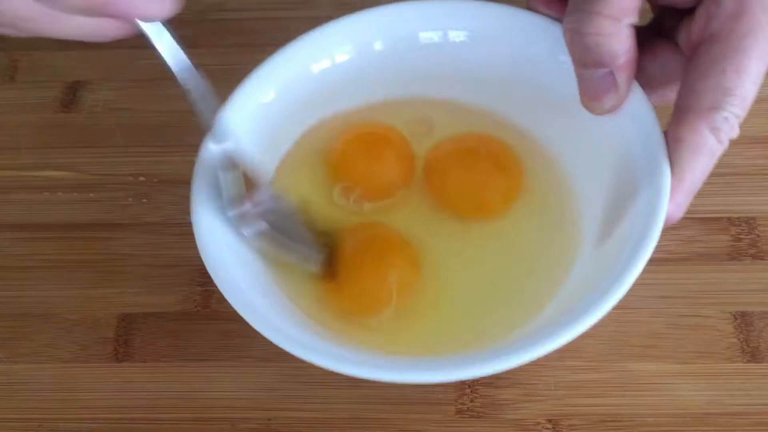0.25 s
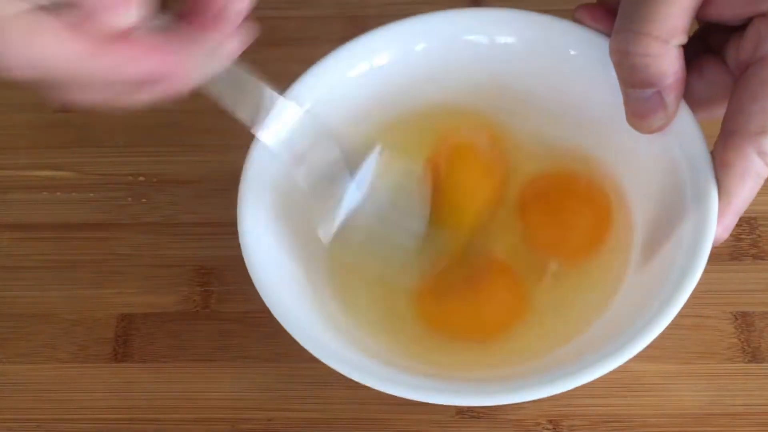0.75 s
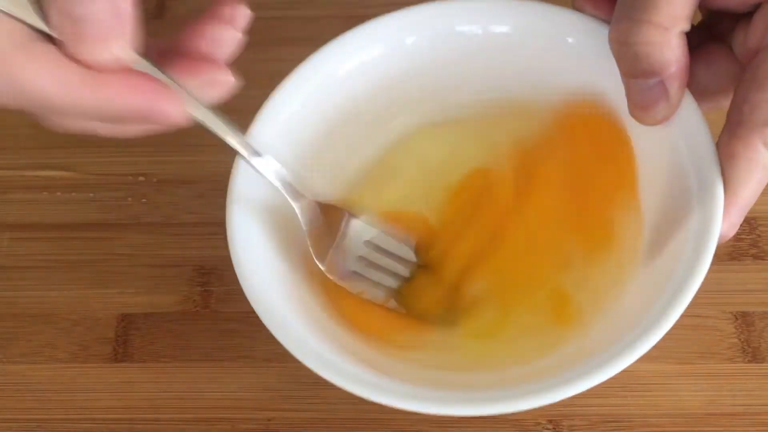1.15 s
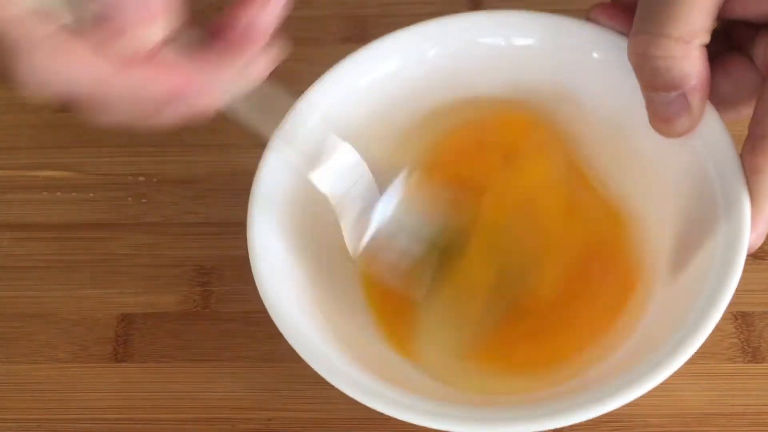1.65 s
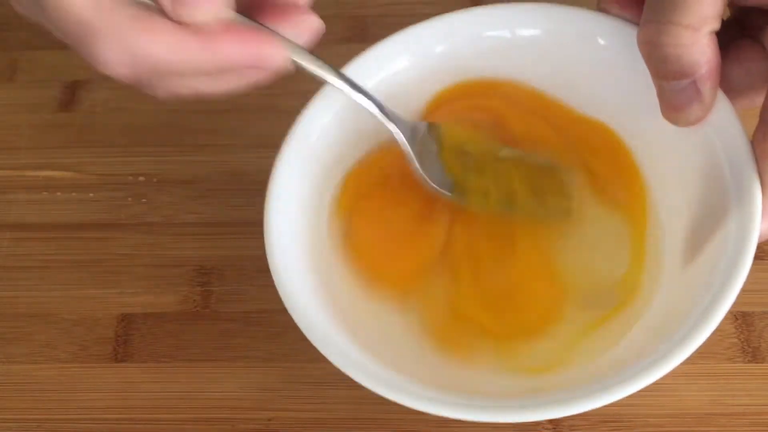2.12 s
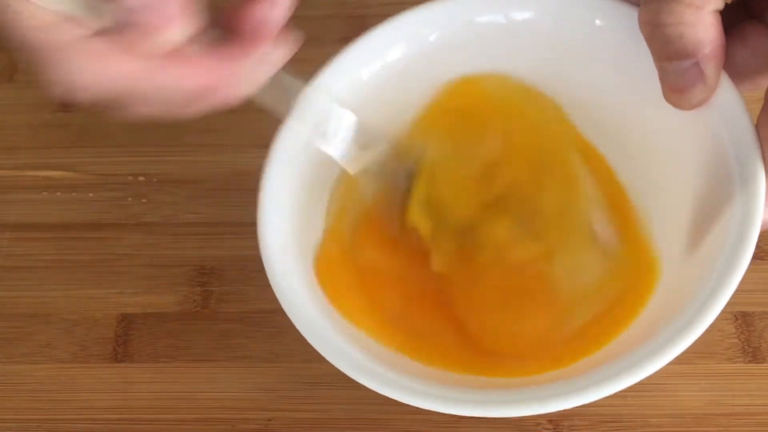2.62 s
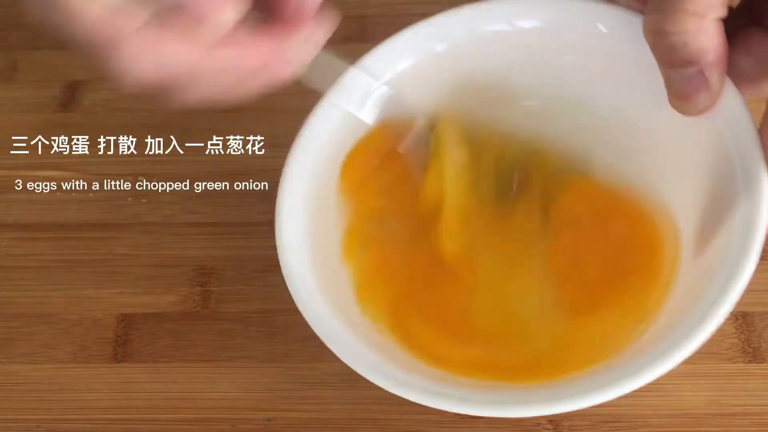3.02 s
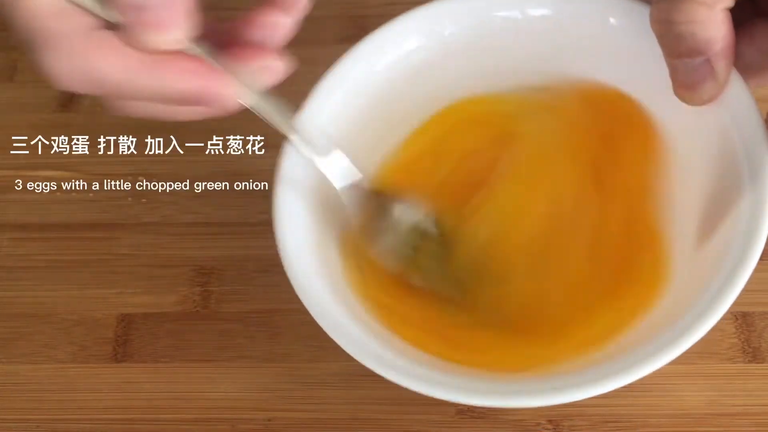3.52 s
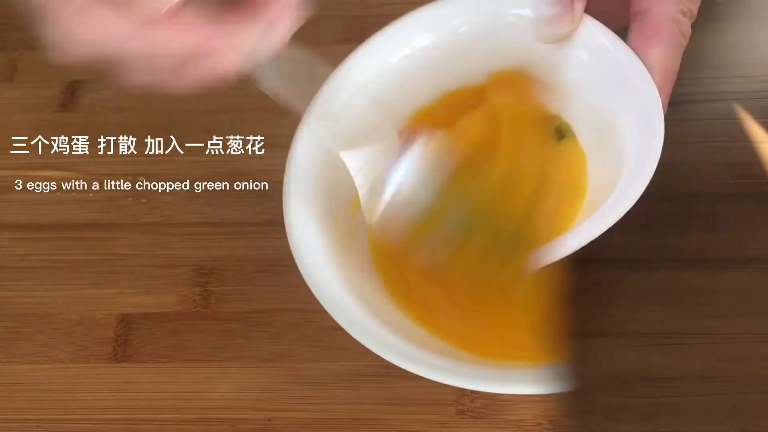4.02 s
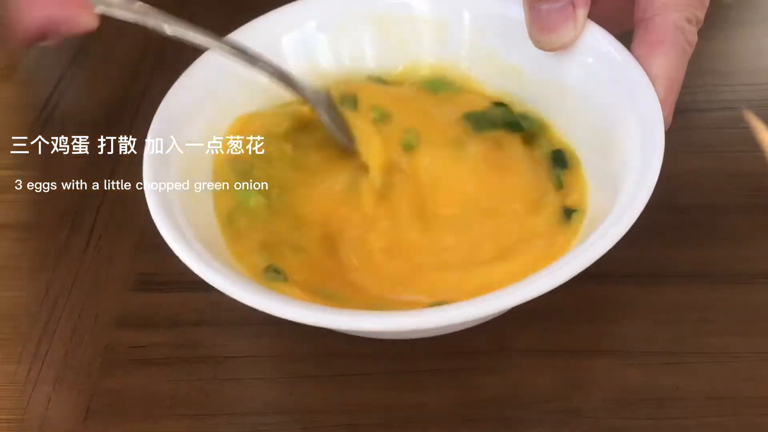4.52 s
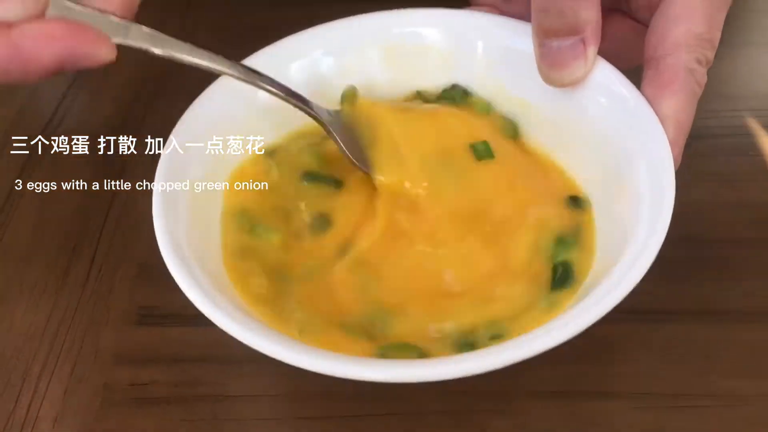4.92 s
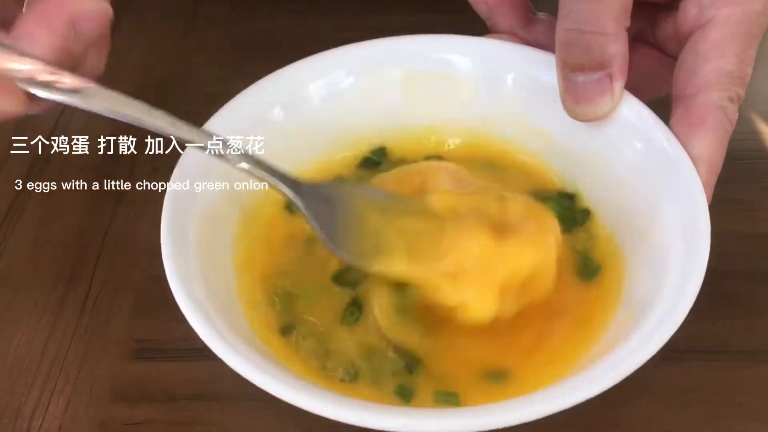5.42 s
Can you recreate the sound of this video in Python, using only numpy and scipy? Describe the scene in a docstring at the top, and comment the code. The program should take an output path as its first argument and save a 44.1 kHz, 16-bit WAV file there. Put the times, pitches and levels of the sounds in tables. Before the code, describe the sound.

Rapid, regular fork clinks against a hand-held ceramic bowl grow eggy and plopping, then give way to quieter, uneven stirring taps.

```python
"""A metal fork beats eggs in a hand-held ceramic bowl, about 5.5 strokes a second, after a dish is set down.
Each stroke excites damped bowl modes and the fork's own modes; egg on the fork adds body and damps its ring.
Air pockets plop as gliding sine bubbles, tines slap and scrape as noise bursts, and one squeaks twice.
Later the fork stirs lower in the bowl with double taps. Two reflections and a noise tail form a small
kitchen; filtered noise and a wavering low drone form a faint outdoor rumble."""
import sys
import numpy as np
from scipy import signal
from scipy.fft import rfft, irfft
from scipy.io import wavfile

SR = 44100
rng = np.random.default_rng(int(sys.argv[2]) if len(sys.argv) > 2 else 0)


def to_wav(sig):
    """Store sig (one row per channel, or 1-D mono) as 16-bit WAV at the path in sys.argv[1].

    Samples outside -1..1 are clipped; the rate is SR.
    """
    pcm = np.clip(np.atleast_2d(sig), -1, 1) * 32767
    pcm = np.round(pcm).astype(np.int16)
    wavfile.write(sys.argv[1], SR, pcm.T)  # frames by channels


N = 249606
TIME = np.arange(N) / SR


def undb(db):
    """Level as a logarithm: 20 dB is a factor of ten in amplitude."""
    return 10 ** (np.asarray(db) / 20)


def add(track, s, sound):
    """Superposition: a sound is summed into the track at time s."""
    i = max(int(s * SR), 0)
    track[i:i + len(sound)] += sound[:max(N - i, 0)]


def band(x, lo_hz, hi_hz, order=3):
    """Causal Butterworth band-pass, its upper edge kept below half the sample rate."""
    sos = signal.butter(order, [lo_hz, min(hi_hz, .49 * SR)], "band", fs=SR, output="sos")
    return signal.sosfilt(sos, x)


def fade(t, t60):
    """Exponential damping: the amplitude falls by 60 dB in t60 seconds."""
    return np.exp(-np.log(1000) * t / t60)


def burst(t, t60):
    """Broadband impact: exponentially damped white noise."""
    return rng.standard_normal(len(t)) * fade(t, t60)


def ring(t, hz, t60, db, detune, scatter_db):
    """Modal superposition: each blow excites the modes at a slightly different spot and grip."""
    pitch, size, turn = rng.standard_normal((3, len(hz), 1))
    mode_hz = hz[:, None] * (1 + detune * pitch)
    waves = np.sin(2 * np.pi * (mode_hz * t + turn))
    gains = undb(db[:, None] + scatter_db * size)
    return np.sum(gains * waves * fade(t, t60[:, None]), axis=0)


# spectrum of outdoor rumble and room air: f/Hz, relative level per hertz/dB
AIR_SPECTRUM = [(20, -32), (40, 6), (60, 0), (90, -2), (170, 0.5), (280, -7), (500, -18), (1000, -21),
                (2500, -21.5), (5000, -28), (10000, -33.5), (16000, -42.5)]
# course of the rumble: t/s, relative bass level/dB, relative drone level/dB
RUMBLE_COURSE = [(0, 1.5, 1), (3.901, -4, -0.5), (4.3, -29, -7.5), (4.601, -20, -15.5), (5.66, -11, -19)]


def outdoors(air_db=-61, drone_db=-62, drone_hz=58.5, wander_hz=2.5, waver_db=2, bass_hz=170):
    """Spectral shaping of noise plus a frequency-modulated drone, which fades; the bass dips and part returns."""
    f = np.arange(N // 2 + 1) * SR / N
    hz, db = np.transpose(AIR_SPECTRUM)
    shape = undb(np.interp(np.log(f + 1), np.log(hz), db))
    air = irfft(rfft(rng.standard_normal(N)) * shape, N)
    air = undb(air_db) * air / np.std(air)
    bass = irfft(rfft(air) / (1 + (f / bass_hz) ** 2), N)
    s, bass_course_db, drone_course_db = np.transpose(RUMBLE_COURSE)
    knots = np.arange(0, N / SR + 1, .1)
    wander, waver = (np.interp(TIME, knots, rng.standard_normal(len(knots))) for _ in range(2))
    # sqrt(2) gives the sine unit effective value
    drone = np.sqrt(2) * np.sin(2 * np.pi * np.cumsum(drone_hz + wander_hz * wander) / SR)
    bass_gain = undb(np.interp(TIME, s, bass_course_db))
    drone_gain = undb(drone_db + waver_db * waver + np.interp(TIME, s, drone_course_db))
    return air - bass + bass_gain * bass + drone_gain * drone


# dish set down, knock and settling: t/s, knock level/dB, bright scrape level/dB
DISH_CONTACTS = [(.0045, -25, -30.5), (.014, -38, -48), (0.0211, -48, -25), (0.028, -32, -38),
                 (0.035, -35, -28), (0.052, -36, -41)]
# modes of the dish before the contact damps them further: f/Hz, t60/s, relative level/dB
DISH_MODES = [(1490, 0.047, -5.5), (1760, 0.038, 0), (1940, 0.036, -8.5), (2580, 0.054, -12.5),
              (3490, 0.022, -11), (5000, 0.02, -13)]


def dish(tail_db=-37, tail_t60=0.82, skid_db=-44, skid_t60=0.31, contact_t60=0.049):
    """Contact damping shortens the modes of a dish as it knocks; friction noise skids and a noise band rings out."""
    out, t = np.zeros(N), TIME[:SR // 3]
    for s, db, scrape_db in DISH_CONTACTS:
        modes = ring(t, *np.transpose(DISH_MODES), detune=0.045, scatter_db=-0.5)
        add(out, s, undb(db) * modes * fade(t, contact_t60))
        add(out, s, undb(scrape_db) * band(burst(t, 0.038), 6660, 8030, order=1))
    skid = band(burst(t, skid_t60), 940, 8000, order=3)
    add(out, DISH_CONTACTS[1][0], undb(skid_db) * skid)
    tail = band(burst(t, tail_t60), 1300, 2200, order=2)
    add(out, DISH_CONTACTS[0][0], undb(tail_db) * tail)
    return out


# near reflections: delay t/s, level/dB
REFLECTIONS = [(0.0103, -23.5), (0.0227, -30.5)]
# diffuse tail: lower edge f/Hz, upper edge f/Hz (capped below half the sample rate), t60/s, level/dB
DIFFUSE_TAIL = [(217, 1020, 0.74, -47.5), (1260, 2370, 0.53, -45.5), (2740, 3600, 0.9, -53.5),
                (4230, 7200, 0.33, -49), (7460, 10000, 0.32, -51), (10300, 24000, 0.23, -44.5)]


def kitchen(x, build_s=0.0036):
    """Convolution with a room response: two near reflections and a diffuse tail, shortest in the top band."""
    t = TIME[:SR * 3 // 4]
    response = sum(undb(db) * band(burst(t, t60), lo_hz, hi_hz) for lo_hz, hi_hz, t60, db in DIFFUSE_TAIL)
    response *= 1 - np.exp(-t / build_s)
    for delay, db in REFLECTIONS:
        response[int(delay * SR)] += undb(db)
    return x + signal.fftconvolve(x, response)[:N]


# contacts of fork and bowl: t/s, strength level/dB
CONTACTS = [(0.1836, -35), (.376, -31.5), (0.4207, -48), (0.5553, -30.5), (0.6055, -46), (.7367, -32),
            (.914, -32), (1.0959, -32.5), (1.271, -30), (1.4523, -30.5), (1.6321, -30.5), (1.8051, -31.5),
            (1.9772, -32.5), (2.003, -54), (2.1514, -27.5), (2.3342, -38), (2.532, -30.5), (2.7114, -26.5),
            (2.8805, -35), (2.9005, -30.5), (3.0875, -30.5), (3.2642, -25.5), (3.2766, -34.5),
            (3.4567, -33.5), (3.6421, -30.5), (3.826, -34), (4.0019, -33), (4.0615, -43.5), (4.1909, -38.5),
            (4.2648, -42.5), (4.302, -44.5), (4.3647, -45.5), (4.4017, -49), (4.44, -39.5), (4.4767, -39),
            (4.6665, -43), (4.795, -47.5), (4.8243, -39.5), (4.861, -37.5), (5.0367, -37), (5.068, -39.5),
            (5.1982, -39.5), (5.2305, -36.5), (5.262, -39), (5.4269, -35), (5.4402, -35.5), (5.626, -33.5),
            (5.6331, -33)]
STIR_FROM_S, STROKE_ABOVE_DB = 4.1, -37.5


def beating_strokes():
    """A level threshold selects the full strokes of the beating from the light taps between them."""
    return [(s, db) for s, db in CONTACTS if db > STROKE_ABOVE_DB and s < STIR_FROM_S]


def entry_ticks(lead_s=.034, scatter_s=.012, tick_db=-16.5, tick_t60=.008):
    """Liquid entry: the tines tick lightly on their way into the egg ahead of each full beating stroke."""
    out, t = np.zeros(N), TIME[:SR // 20]
    for s, db in beating_strokes():
        lead = lead_s + scatter_s * rng.uniform(-1, 1)
        add(out, s - lead, undb(db + tick_db) * band(burst(t, tick_t60), 3600, 9300, order=1))
    return out


# the yolks break up and coat the fork more and more between these times
COATING_START_S, COATING_END_S = 1, 2.34


def egg_coating(s):
    """Linear growth of the egg film on the fork, from 0 to 1."""
    return np.interp(s, (COATING_START_S, COATING_END_S), (0, 1))


# colour of a blow relative to its strength, for a clean, an egg-coated and a stirring fork:
# low register level/dB, middle level/dB, treble level/dB, free fork ring level/dB
CLEAN_COLOUR = (-14, -1, .5, -8)
COATED_COLOUR = (-3.5, 1.5, -1, -21.5)
STIRRING_COLOUR = (-3, 0, -1, -22)
# a contact just ahead of a harder one only grazes the wall and has less body
GRAZE_WITHIN_S, GRAZE_DB = .045, -11.5


def blows():
    """Damping by a liquid film: egg on the fork adds body and weakens its ring; a graze is thin."""
    following = CONTACTS[1:] + [(np.inf, 0)]
    for (s, db), (next_s, next_db) in zip(CONTACTS, following):
        coating = egg_coating(s)
        beating = (1 - coating) * np.array(CLEAN_COLOUR) + coating * np.array(COATED_COLOUR)
        colour = np.array(STIRRING_COLOUR) if s > STIR_FROM_S else beating
        low_db, mid_db, high_db, free_db = db + colour
        grazes = next_s - s < GRAZE_WITHIN_S and next_db > db
        yield s, low_db + GRAZE_DB * grazes, mid_db, high_db, free_db


# bowl with the fork against it: f/Hz, t60/s, relative level when beating/dB, when stirring/dB
CHOKED_BOWL = [(1593, 0.023, -25, -15), (2317, 0.026, -11.5, -3), (2501, 0.024, -11, -3.5),
               (3352, 0.013, -3.5, 2.5), (3577, 0.017, 1, -6), (4253, 0.0096, -11, 1.5),
               (5380, 0.031, -21.5, -32), (7010, 0.015, -14, -11), (7340, 0.0055, -5.5, 0),
               (8833, 0.0086, 0, -5.5), (9255, 0.013, -3.5, -6.5), (10430, 0.0047, -0.5, -6.5),
               (12880, 0.0056, -4.5, -26.5), (14120, 0.054, -20, -22.5), (16500, 0.015, -2, -27.5)]


def clink(t, stirring, levels_db, crack_db=-5, crack_t60=0.019, contact_s=.00035):
    """Modal excitation of the choked bowl; egg on the fork, stirring and grazing set three register levels."""
    hz, t60, beat_db, stir_db = np.transpose(CHOKED_BOWL)
    if stirring:  # the fork lands at more varied spots
        modes = ring(t, hz, t60, stir_db, detune=.015, scatter_db=3)
    else:
        modes = ring(t, hz, t60, beat_db, detune=.007, scatter_db=2)
    crack = undb(crack_db) * band(burst(t, crack_t60), 2000, 13000, order=1)
    # every blow swells in over a fraction of a millisecond
    blow = (modes + crack) * (1 - np.exp(-t / contact_s))
    registers = [band(blow, lo, hi) for lo, hi in [(600, 2900), (2900, 6000), (6000, 16000)]]
    # each register is levelled over its first hundredth of a second
    return sum(undb(db) * part / np.std(part[:SR // 100]) for db, part in zip(levels_db, registers))


def thump(t, start_hz=170, end_hz=78, sag_s=.008, t60=0.12):
    """Dispersion of bending waves in the table top: the higher ones arrive first."""
    nominal_hz = end_hz + (start_hz - end_hz) * np.exp(-t / sag_s)
    hz = nominal_hz * rng.uniform(0.66, 1.3)
    swell = 1 - np.exp(-t / sag_s)
    return np.sin(2 * np.pi * np.cumsum(hz) / SR) * fade(t, t60) * swell


# modes of the table top under the bowl: f/Hz, t60/s, relative level/dB
TABLE_MODES = [(176, 0.034, -19), (420, 0.028, -16.5), (604, 0.011, -17), (1113, 0.035, -24.5)]


def table_knock(t, knock_db=-8, thump_db=-24):
    """Structure-borne sound: a dull knock passes through the bowl into the table."""
    modes = ring(t, *np.transpose(TABLE_MODES), detune=0.057, scatter_db=5.5)
    return undb(knock_db) * modes + undb(thump_db) * thump(t)


# fork ringing freely after the blow: f/Hz, t60/s, relative level/dB
FORK_MODES = [(1682, 0.065, -3.5), (2446, 0.15, -11.5), (3070, 0.19, -6), (3360, 0.34, -24.5),
              (5150, 0.053, 5), (5400, 0.25, -10.5), (6500, 0.14, -8), (9550, .12, -9.5),
              (11600, 0.036, 7.5), (13000, .1, -20.5)]


def fork_strokes(ring_db=-3, cushion=0.68):
    """Modal superposition: each contact sounds the choked bowl, the free fork and the table."""
    out, t = np.zeros(N), TIME[:SR * 3 // 4]
    for s, low_db, mid_db, high_db, free_db in blows():
        add(out, s, clink(t[:SR // 10], s > STIR_FROM_S, (low_db, mid_db, high_db)))
        free_ring = ring(t[:SR // 3], *np.transpose(FORK_MODES), detune=0.0077, scatter_db=3.5)
        add(out, s, undb(free_db + ring_db) * free_ring)
        # the hand cushions the bowl, so what reaches the table grows more slowly than the blow
        push = undb(cushion * (low_db + mid_db) / 2)
        add(out, s, push * table_knock(t[:SR // 8]))
    return out


# single fork modes singing on, mostly around early strokes of the still clean fork:
# t/s, f/Hz, level/dB, t60/s
FORK_PINGS = [(0.186, 5280, -56, 0.68), (.556, 5430, -60.5, 0.38), (0.375, 1739, -51, 0.3),
              (.421, 6520, -35.5, 0.041), (0.577, 5500, -49, 0.092), (0.924, 3070, -50, 0.23),
              (1.277, 5460, -35.5, 0.036)]


def pings():
    """Free damped vibration: single fork modes sing on, mostly around early strokes of the still clean fork."""
    out, t = np.zeros(N), TIME[:SR * 3 // 4]
    for s, hz, db, t60 in FORK_PINGS:
        add(out, s, undb(db) * np.sin(2 * np.pi * hz * t) * fade(t, t60))
    return out


def scrape(scrape_db=-19, skid_s=0.056, grit_db=4, rasp_db=-1, count=14):
    """Dry friction: after a blow the tines skid in uneven little slips that stir the same bowl modes."""
    out, t = np.zeros(N), TIME[:SR // 50]
    hz, t60, _, stir_db = np.transpose(CHOKED_BOWL)
    for s, db in CONTACTS:
        for wait, weakness in zip(rng.beta(2, 3, count), rng.exponential(size=count)):
            modes = ring(t, hz, t60, stir_db, detune=.07, scatter_db=2)
            slip = modes + undb(rasp_db) * band(burst(t, 0.011), 1800, 7000, order=1)
            slip_db = db + scrape_db - grit_db * (weakness + 2 * wait)
            add(out, s + 0.0064 + skid_s * wait, undb(slip_db) * slip)
    return out


def bubble(t, hz, t60, max_glide=0.117, swell_s=0.00036):
    """Bubble resonance: an air pocket rings and bends upward in pitch as it opens, each by its own amount."""
    glide = rng.uniform(0, max_glide)
    pitch = hz * (1 + glide * (np.minimum(t / t60, 1) - .15))
    return np.sin(2 * np.pi * np.cumsum(pitch) / SR) * fade(t, t60) * (1 - np.exp(-t / swell_s))


def slosh(grain_db=-57, spread_db=3, lag_s=0.026, centre_hz=3100, octaves=0.74, cycles=26, count=16):
    """Superposed bubble resonances: small bubbles crackle in the wake of each contact."""
    out, t = np.zeros(N), TIME[:SR // 20]
    for s, _ in CONTACTS:
        draws = np.clip(rng.standard_normal((count, 2)), -2, 2)
        for wait, (pitch, size) in zip(rng.exponential(size=count), draws):
            hz = min(centre_hz * 2 ** (octaves * pitch), SR / 3)
            gain = undb(grain_db + spread_db * (size - wait))
            add(out, s + 0.0027 + lag_s * wait, gain * bubble(t, hz, cycles / hz))
    return out


POCKET_CYCLES = 30  # cycles until a pocket is 60 dB down, so big low ones last longest


def gurgles(gurgle_db=-53, spread_db=3, centre_hz=1800, octaves=.8, reach_s=0.072, count=3):
    """Random bubble resonance: as the yolks break, faint pockets open around every contact."""
    out, t = np.zeros(N), TIME[:SR // 10]
    for s, _ in CONTACTS:
        for when, pitch, size in rng.uniform(-1, 1, (count, 3)):
            hz = centre_hz * 2 ** (octaves * pitch)
            gain = egg_coating(s) * undb(gurgle_db + spread_db * size)
            add(out, s + reach_s * when, gain * bubble(t, hz, POCKET_CYCLES / hz))
    return out


# air pockets bursting in the egg: t/s, nominal f/Hz, relative level/dB
POCKETS = [(1.3417, 5860, -27.5), (1.343, 3150, -35.5), (1.3667, 8850, -24.5), (1.408, 4120, -31.5),
           (1.758, 2750, -39), (1.8689, 2940, -32), (2.0092, 2500, -25.5), (2.1436, 1320, -24),
           (2.145, 2330, -18), (2.2953, 1100, -33), (2.3075, 1800, -37), (2.3703, 1066, -28.5),
           (2.3712, 662, -38), (2.462, 1870, -38.5), (2.4714, 3500, -31), (2.6167, 2070, -41.5),
           (2.676, 1100, -45), (2.726, 1100, -39.5), (2.883, 1500, -33.5), (3.029, 2270, -28.5),
           (3.077, 1010, -36.5), (3.09, 520, -48), (3.266, 500, -39), (3.267, 1052, -33),
           (3.273, 1735, -25.5), (3.46, 950, -43.5), (3.5373, 2040, -30.5), (3.6231, 2100, -34.5),
           (3.646, 610, -45), (3.652, 1320, -43.5), (3.8684, 2130, -33), (3.9903, 2150, -32.5),
           (4.1676, 2110, -34.5), (4.4028, 1910, -29.5), (4.797, 1270, -39), (4.8232, 1890, -32),
           (4.9971, 2030, -40), (5.393, 1890, -30), (5.3946, 1130, -38.5), (5.582, 1830, -24.5),
           (5.5831, 1280, -28.5), (5.640, 1070, -29)]


def plops(plop_db=3, snap_db=-11, snap_t60=0.0082, splinter_db=-5, spread_octaves=0.43, scatter_s=.003, count=4):
    """Bubble fragmentation: a pocket bursts with a wet snap and sheds short-lived, mostly smaller bubbles."""
    out, t = np.zeros(N), TIME[:SR // 8]
    for s, hz, db in POCKETS:
        t60 = POCKET_CYCLES / hz
        snap = band(burst(t, snap_t60), 1550, 11000, order=1)
        add(out, s, undb(db + plop_db) * bubble(t, hz, t60) + undb(db + snap_db) * snap)
        for wait, pitch in zip(rng.exponential(size=count), rng.uniform(-1, 1.6, count)):
            splinter_hz = min(hz * 2 ** (spread_octaves * pitch), SR / 3)
            splinter = bubble(t, splinter_hz, t60 / 2)
            add(out, s + scatter_s * wait, undb(db + splinter_db) * splinter)
    return out


# tines slapping into the egg: t/s, level/dB, t60/s
TINE_SLAPS = [(1.416, -30.5, 0.01), (2.145, -23, 0.0065), (2.3072, -39, .008), (2.705, -26, 0.013),
              (2.883, -18.5, .008), (3.077, -27, 0.015), (3.416, -38, .008), (3.441, -31.5, 0.0095),
              (3.6227, -26, 0.011), (3.808, -30.5, 0.012), (3.9898, -11.5, 0.0026), (4.035, -29.5, 0.013),
              (4.214, -37, .012), (4.796, -30.5, 0.011), (4.9973, -36.5, .008), (5.394, -26, 0.0073),
              (5.5809, -16.5, 0.0054), (5.6395, -20, .008)]


def slaps():
    """Liquid impact: now and then the tines hit the egg with a sharp, wet burst of noise."""
    out, t = np.zeros(N), TIME[:SR // 20]
    for s, db, t60 in TINE_SLAPS:
        add(out, s, undb(db) * band(burst(t, t60), 3400, 10500, order=1))
    return out


# hard blows that jolt the bowl loose in the hand: t/s, relative level/dB
HARD_BLOWS = [(2.151, -48.5), (3.267, -41), (5.632, -49)]
# bowl ringing out while loose: nominal f/Hz, t60/s, relative level/dB
LOOSE_BOWL_MODES = [(1380, .25, -18), (1720, 0.28, -8), (2120, .45, -7), (2380, .35, -11), (2720, 0.33, -9),
                    (3080, 0.21, -3), (3580, 0.16, -9.5), (4500, 0.16, 1.5), (4500, 0.39, -8.5),
                    (4560, .32, -8), (4750, .3, -4.5), (5500, .25, -9.5)]


def jolts(ring_db=-7, count=7):
    """Mode splitting: the uneven wall splits each mode into close neighbours that beat against each other."""
    out, t = np.zeros(N), TIME[:SR // 2]
    for s, db in HARD_BLOWS:
        for _ in range(count):
            modes = ring(t, *np.transpose(LOOSE_BOWL_MODES), detune=.04, scatter_db=2)
            add(out, s, undb(db + ring_db) * modes)
    return out


# a tine slipping on the glaze: t/s, f/Hz, level/dB, length t/s
TINE_SQUEAKS = [(3.2652, 6520, -13, .008), (5.631, 4180, -16.5, 0.0031)]


def squeaks(overtone_db=-24, linger_db=-33, linger_t60=.55):
    """Stick-slip friction holds one mode singing for milliseconds; a faint noise band lingers on release."""
    out, after = np.zeros(N), TIME[:SR // 2]
    for s, hz, db, length in TINE_SQUEAKS:
        t = TIME[:int(length * SR)]
        phase = 2 * np.pi * hz * t
        grip = np.minimum(t / 0.00027, 1) * np.cos(np.pi / 2 * (t / length) ** 4) ** 2
        tone = np.sin(phase) + undb(overtone_db) * np.sin(2 * phase)
        add(out, s, undb(db) * grip * tone)
        linger = band(burst(after, linger_t60), hz - 70, hz + 170, order=2)
        add(out, s + length, undb(db + linger_db) * linger / np.std(linger[:SR // 20]))
    return out


def scene():
    """Superposition of sources: everything at the table sounds into the kitchen, over the outdoors."""
    bowl = fork_strokes() + pings() + scrape() + jolts() + squeaks()
    egg = entry_ticks() + slaps() + plops() + gurgles() + slosh()
    return (kitchen(bowl + egg + dish()) + outdoors())[None]


def record(dry, top_hz=15900):
    """Band limitation: a steep elliptic low-pass removes the extreme treble."""
    # order 8, 0.2 dB passband ripple, 70 dB stopband attenuation
    return signal.sosfilt(signal.ellip(8, .2, 70, top_hz, fs=SR, output="sos"), dry)


dry = scene()
out = record(dry)
to_wav(out)
```